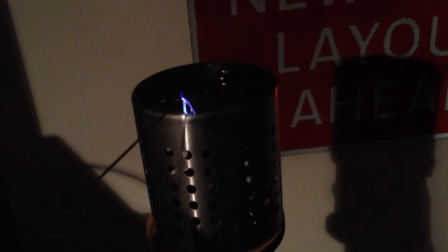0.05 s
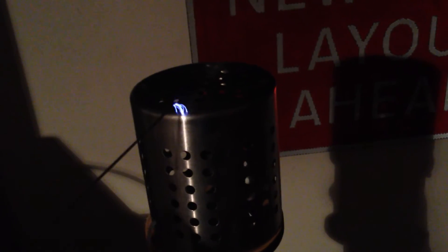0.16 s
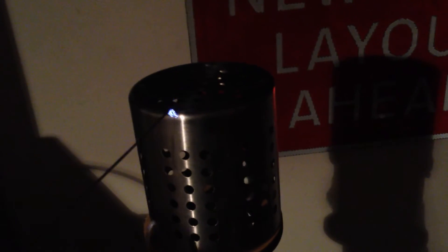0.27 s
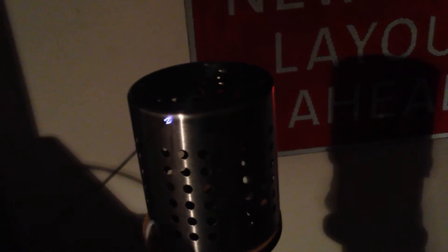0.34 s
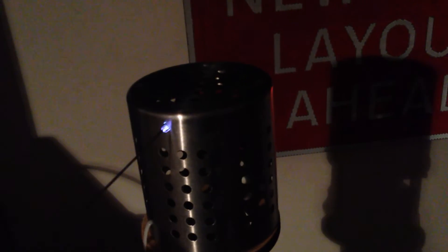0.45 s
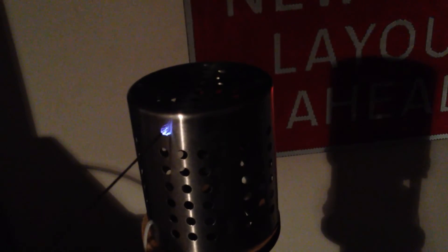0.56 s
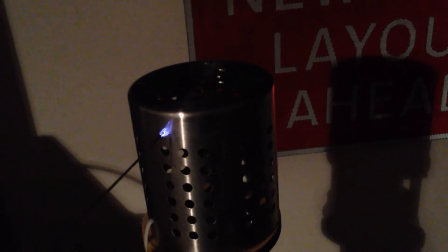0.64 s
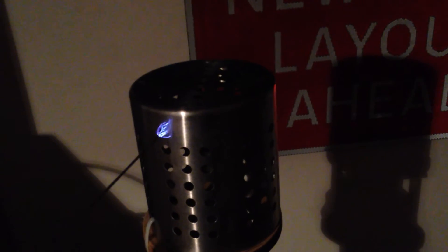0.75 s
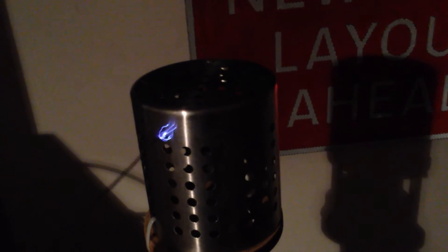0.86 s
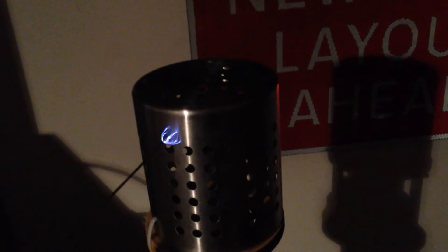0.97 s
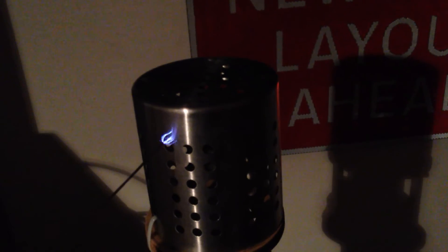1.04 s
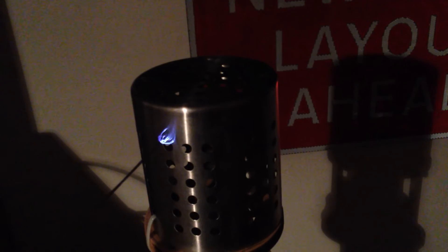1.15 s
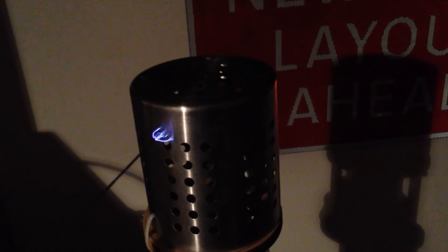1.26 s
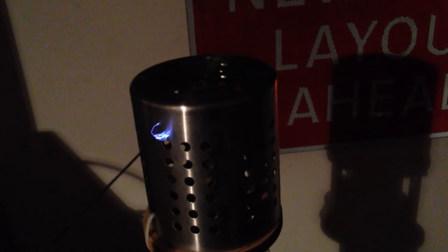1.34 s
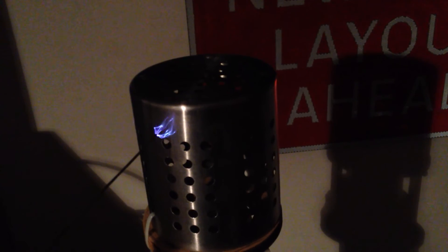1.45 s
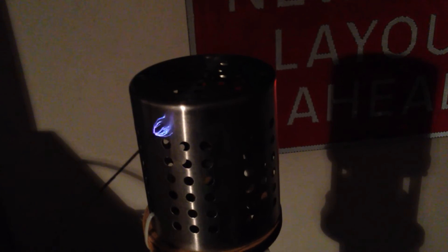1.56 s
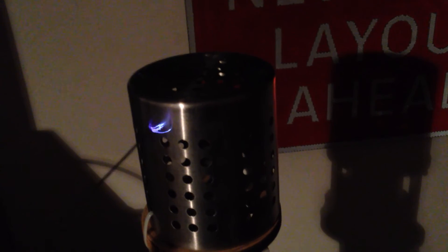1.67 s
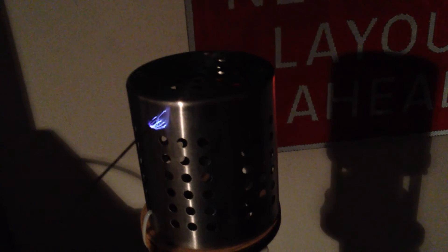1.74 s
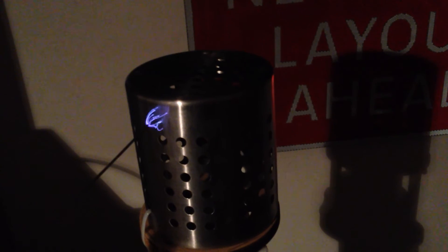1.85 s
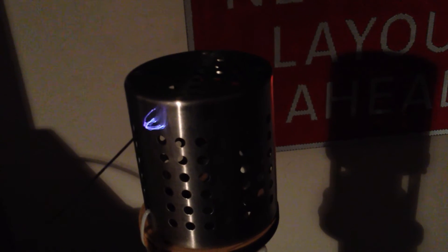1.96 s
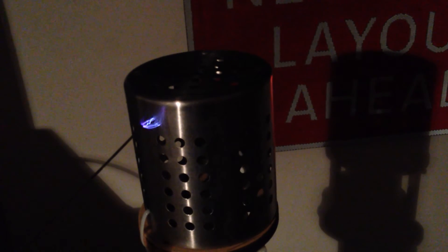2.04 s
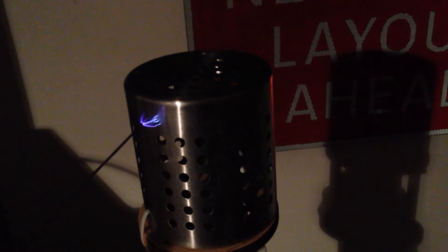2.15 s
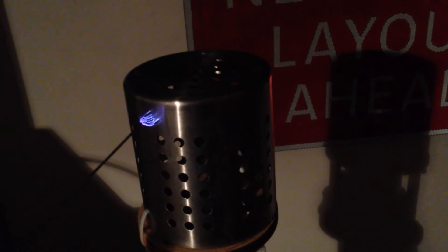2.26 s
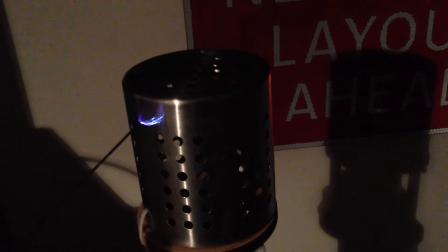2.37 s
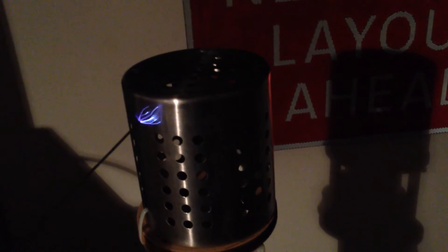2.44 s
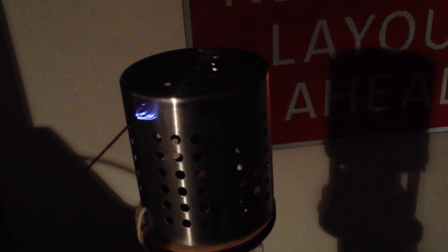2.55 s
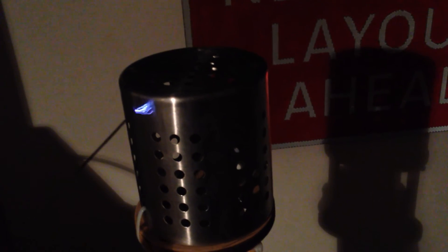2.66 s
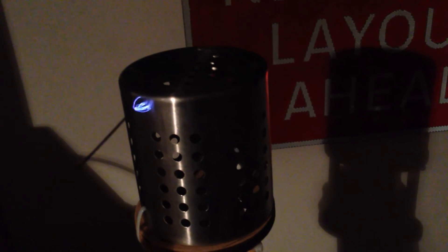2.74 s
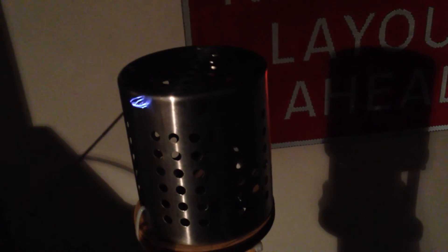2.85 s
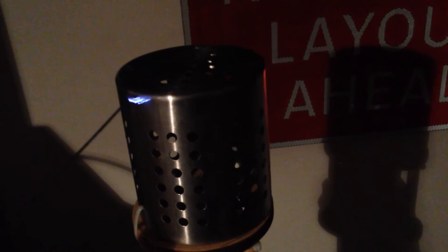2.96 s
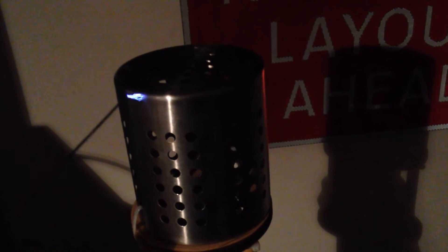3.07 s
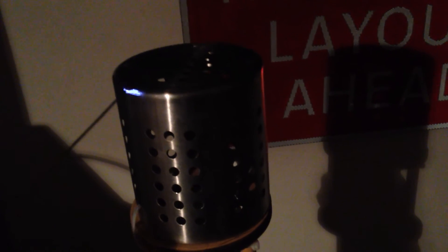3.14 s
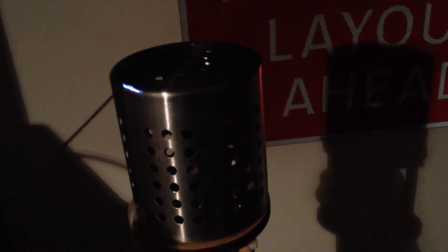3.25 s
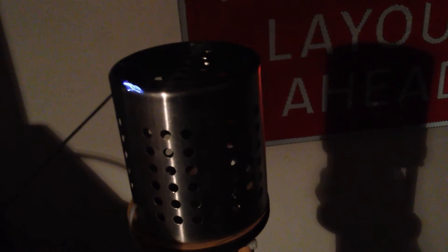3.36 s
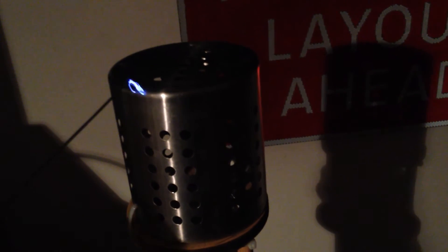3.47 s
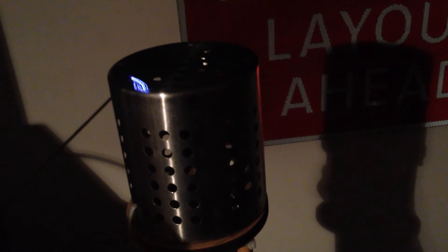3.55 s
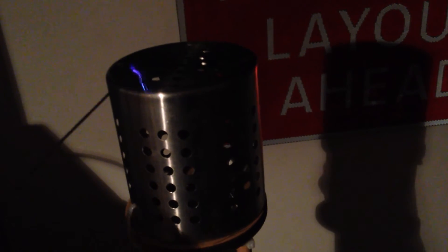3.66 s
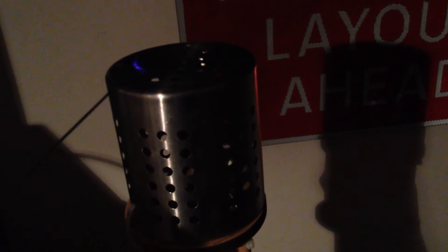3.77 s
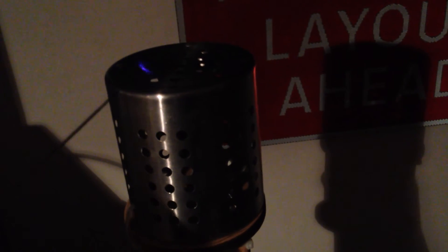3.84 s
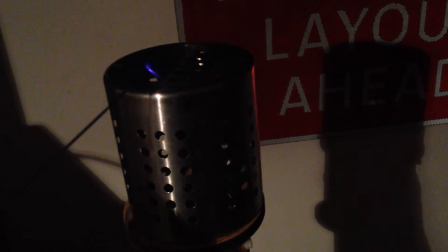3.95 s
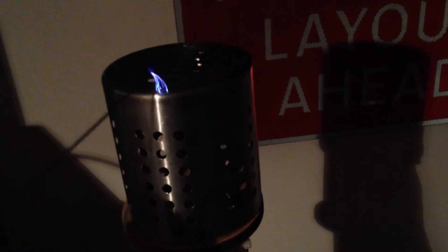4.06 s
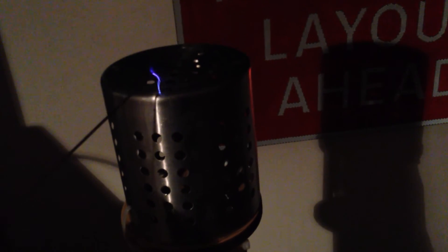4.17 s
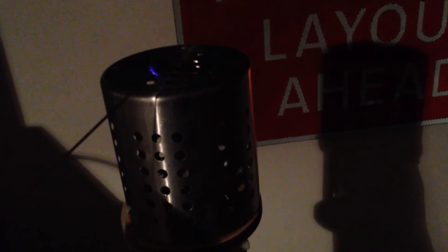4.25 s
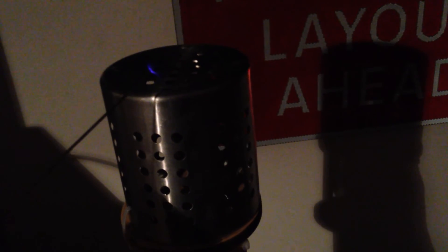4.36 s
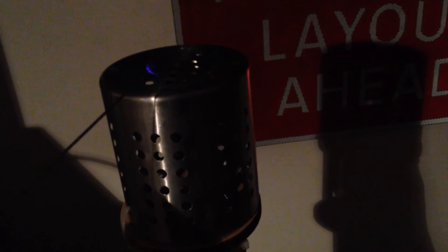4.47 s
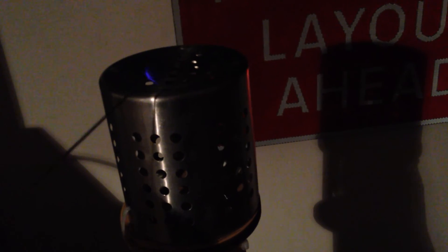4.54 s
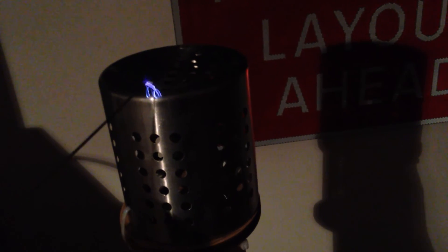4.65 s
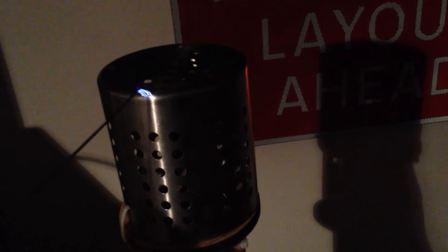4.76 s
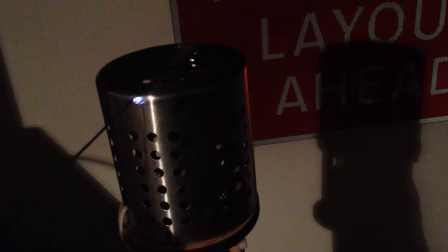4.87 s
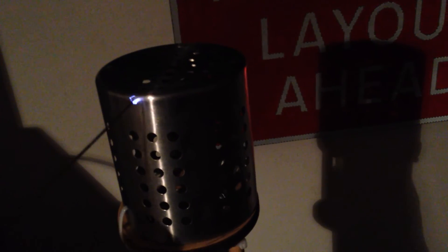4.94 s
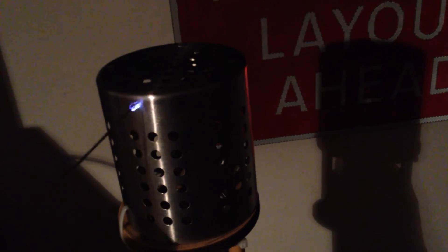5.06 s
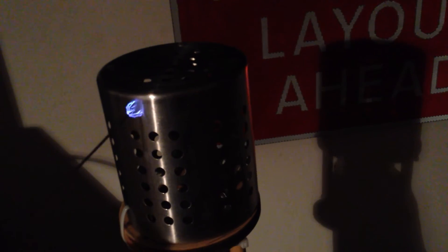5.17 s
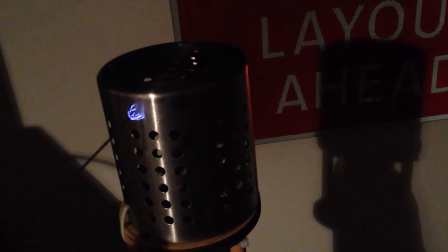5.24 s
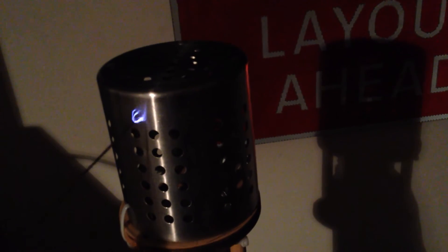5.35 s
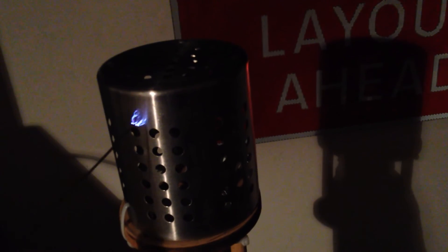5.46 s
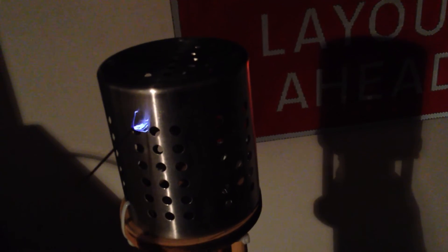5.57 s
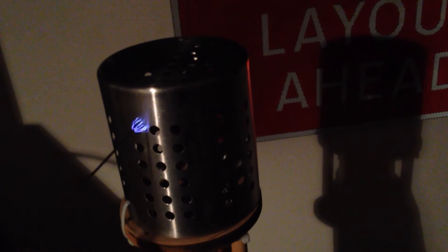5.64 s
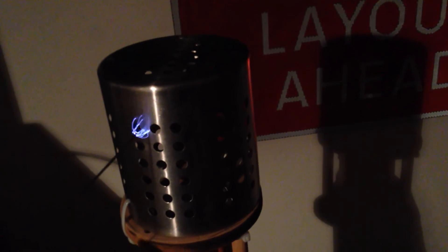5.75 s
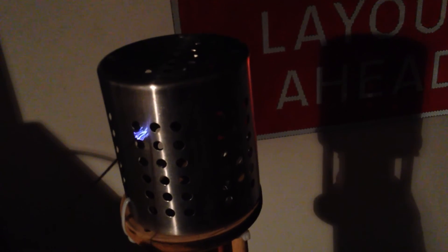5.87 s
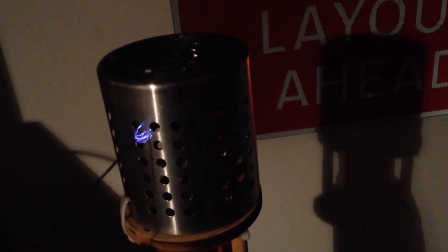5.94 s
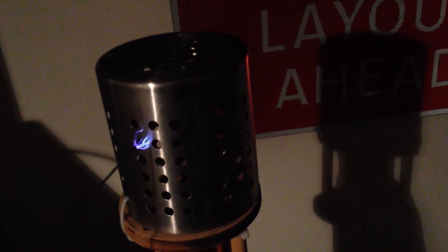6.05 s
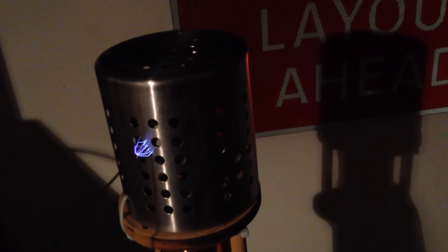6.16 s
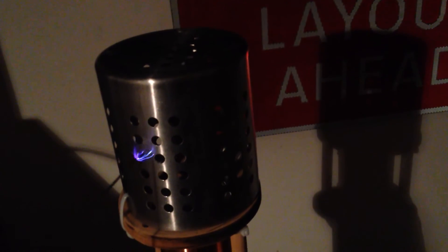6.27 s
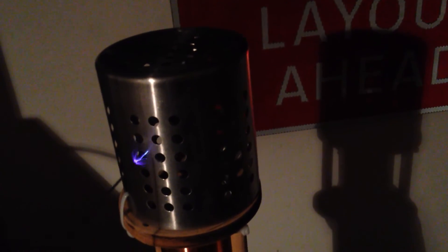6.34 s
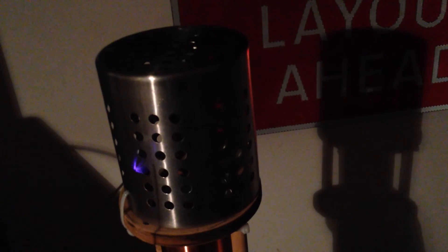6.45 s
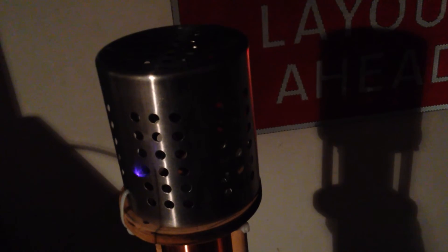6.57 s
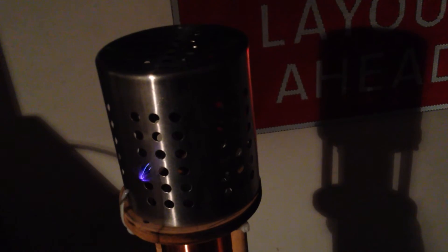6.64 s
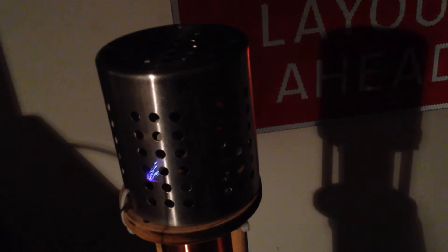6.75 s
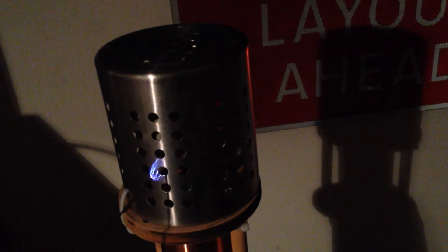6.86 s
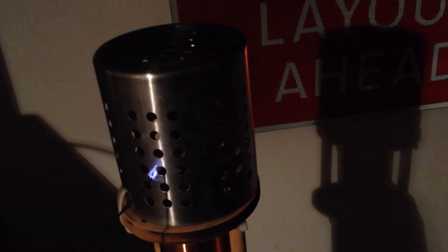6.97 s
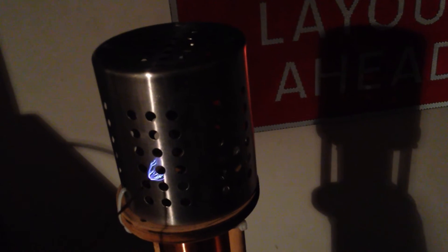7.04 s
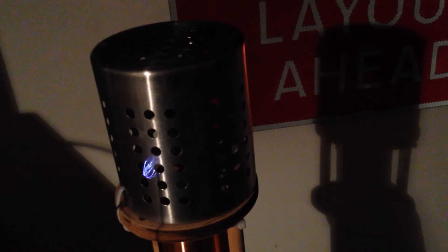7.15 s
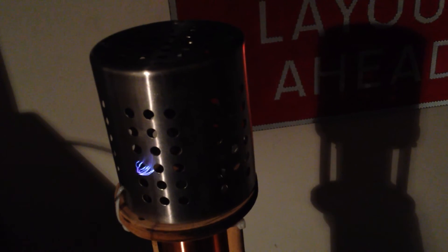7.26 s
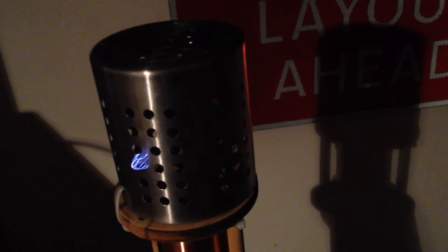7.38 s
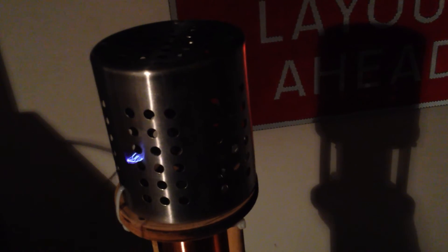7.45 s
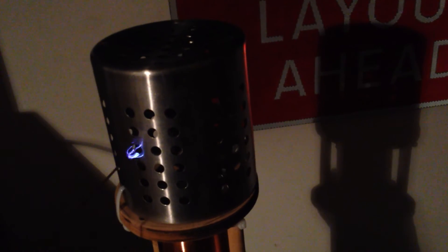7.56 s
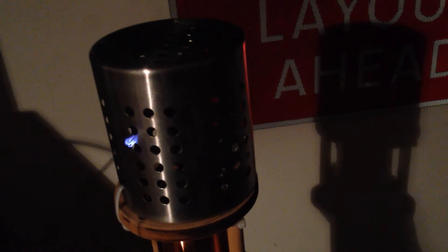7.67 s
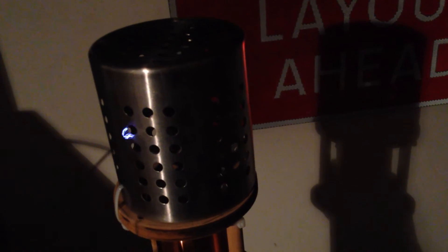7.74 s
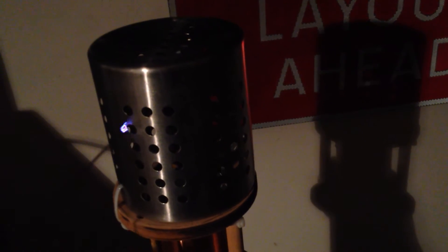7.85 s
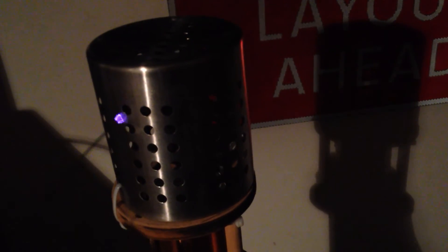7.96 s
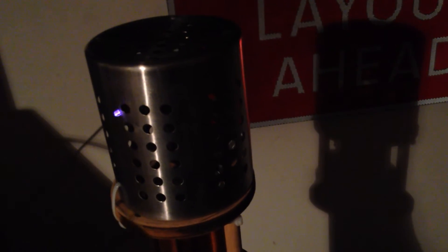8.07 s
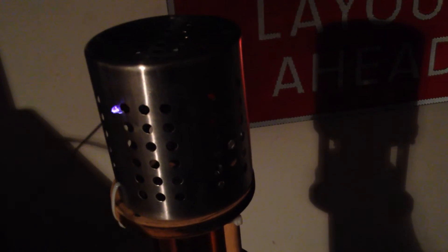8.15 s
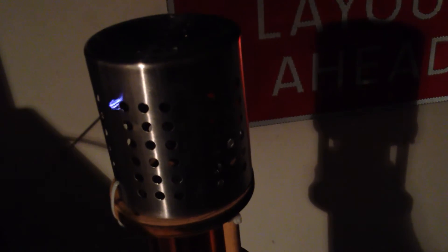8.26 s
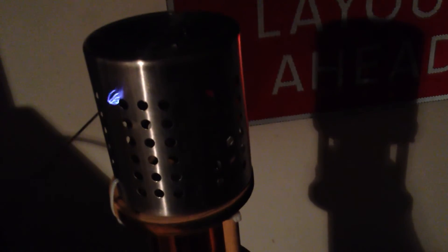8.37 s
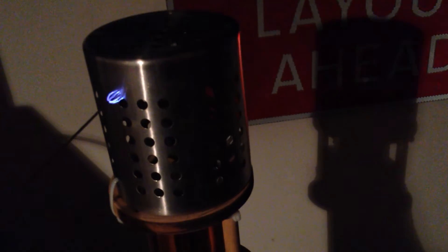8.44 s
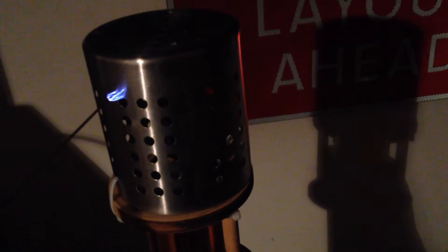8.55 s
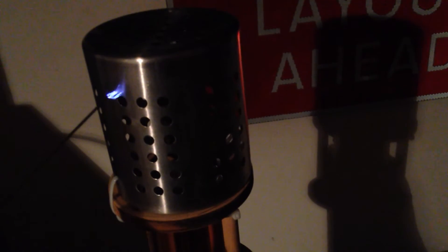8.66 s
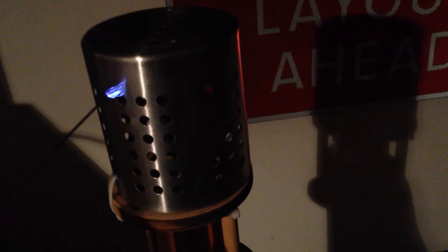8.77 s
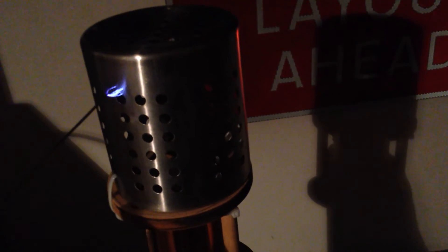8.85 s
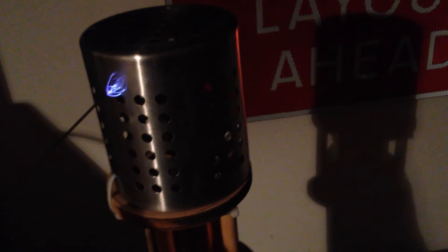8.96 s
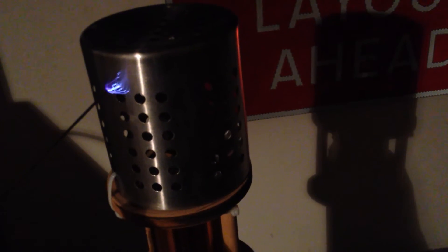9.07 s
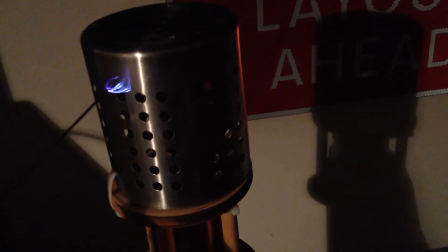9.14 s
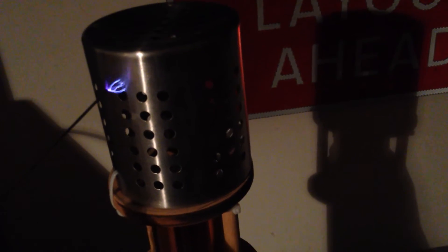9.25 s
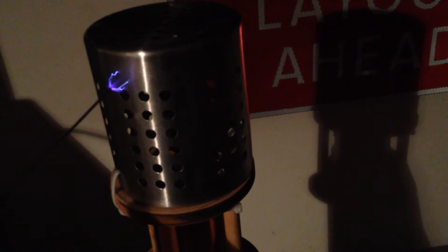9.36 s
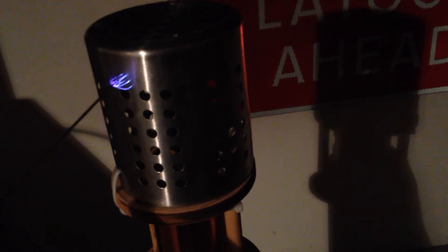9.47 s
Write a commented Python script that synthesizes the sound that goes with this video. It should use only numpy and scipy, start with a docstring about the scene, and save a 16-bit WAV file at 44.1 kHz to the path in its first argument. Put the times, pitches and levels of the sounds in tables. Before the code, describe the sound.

A small high-voltage coil with a motor-driven spark gap buzzes close by in a small room. A soft corona buzz snaps almost at once into a harsh, sizzling arc with low sputter and pops. The arc drops out briefly around four seconds, again after six, and near the end, leaving softer buzz and scattered snaps. Faint motor hum and room air lie underneath. Close mono microphone.

```python
"""A small spark coil buzzes in a room, fired by a rotary gap with eight studs; its motor slowly gains speed, with small sags.
Corona alone comes first: soft pushes in a repeating pattern of eight, a pitched buzz, motor hum and room tone.
A snap at 0.12 s leads in the arc: sharp, sizzling cracks over a low sputter, with hot flares heard as pops.
The arc lets go at 3.7, 4.2, 6.3 and 9.4 s and catches again at 4.1, 4.7 and 6.8 s, with snaps around most of these.
All strikes but the last begin with a surge; the wider the gap, the louder the buzz. Mono, on two equal channels."""
import sys
import numpy as np
from scipy import signal
from scipy.fft import rfft, irfft, next_fast_len
from scipy.io import wavfile
from scipy.ndimage import uniform_filter1d

SR = 44100
rng = np.random.default_rng(int(sys.argv[2]) if len(sys.argv) > 2 else 0)


def generate_wav(sig):
    """Save sig (samples, or channels by samples) to the path in sys.argv[1] as 16-bit PCM at SR."""
    pcm = np.round(np.clip(np.atleast_2d(sig).T, -1, 1) * 32767).astype(np.int16)
    wavfile.write(sys.argv[1], SR, pcm)


N = 419391

# firing rate: [time_s, firings_per_s]
RATE = [(0, 310.6), (0.3, 311.9), (1.2, 318.5), (1.8, 321.3), (2.4, 322.8), (3.3, 326.1), (3.6, 327.0),
        (3.9, 326.4), (4.2, 325.2), (4.7, 323.1), (5.5, 326.3), (6.2, 328.1), (6.8, 326.3), (7.9, 328.8),
        (8.3, 330.7), (9.1, 331.7), (9.5, 331.2)]
# rotor studs, each set slightly off: [late_s, relative_strength_db]
STUDS = [(.00005, -4), (-.00005, -2.5), (0, -1.2), (.00002, 3), (-.00001, 1.4), (-.00007, 2.5),
         (-.00003, 0.7), (.00009, -3.5)]
# burning arc: [time_s, crack_db, sizzle_db, fundamental_db, unsteadiness_db]
ARC = [(0.13, -33, -27.5, -59, -1), (0.42, -41.5, -32, -63, 2.5), (0.58, -35, -28, -55.5, -7),
       (1.05, -33.5, -27.5, -56.5, -2), (1.4, -34, -31, -54, 2), (2.4, -34.5, -32.5, -57.5, 0),
       (2.52, -34, -30.5, -51, 1.5), (3.7, -38.5, -30, -51, 1), (4.7, -37.5, -29, -57.5, -1),
       (5.3, -36.5, -27.5, -54, -4.5), (6.25, -34.5, -32, -53, 0.5), (6.9, -35.5, -29, -55.5, 4),
       (7.4, -36.5, -30, -52, -1), (7.7, -38.5, -32.5, -48.5, 1.5), (8.08, -46, -35.5, -53, 7.5),
       (8.4, -39, -29, -47, 2), (9.1, -35, -28.5, -49.5, -4), (9.39, -35.5, -31.5, -52, 2)]
# buzz, louder as the gap widens: [time_s, harmonics_2_to_4_db, harmonic_5_db, harmonics_from_6_db]
BUZZ = [(0, -52, -49, -46), (0.12, -47, -43.5, -42.5), (0.42, -56, -55, -52), (0.62, -51.5, -46, -53),
        (0.94, -51, -45, -47.5), (0.97, -49, -38, -45.5), (1.4, -46, -43, -44.5), (1.9, -45, -38, -42),
        (2.4, -42.5, -36.5, -40), (3.0, -48.5, -43.5, -45.5), (3.7, -46, -42.5, -42),
        (3.85, -52, -47, -49.5), (4.08, -43.5, -42, -41.5), (4.33, -51, -50, -50), (4.72, -47.5, -43, -47),
        (5.0, -50, -45, -48), (6.15, -45.5, -43.5, -43.5), (6.45, -42, -38.5, -41.5),
        (6.8, -42, -34.5, -41), (7.15, -47, -41.5, -46), (7.75, -48.5, -47, -47.5), (7.95, -52, -53, -53.5),
        (8.28, -49.5, -51, -50), (8.38, -46, -47.5, -46), (8.8, -44.5, -46, -42.5),
        (9.48, -39.5, -40.5, -39)]
# corona alone, relative to the buzz: crack_db, sizzle_db, fundamental_db
CORONA_DB = [-17.5, -9, -17]
# spectrum of a crack: [freq_hz, level_db]
CRACK = [(150, -23), (650, -12.5), (1500, -8), (2500, 1.5), (3300, 2), (4300, -1), (6200, 0), (7200, -1.5),
         (9000, -5), (14000, -42)]
# spectrum of a sizzle: [freq_hz, level_db]
SIZZLE = [(1500, -38.5), (6000, -25), (7400, -10.5), (8500, -4.5), (9700, -1), (11200, -1), (12800, 1.5),
          (14300, 0.5), (15400, -5.5), (17000, -54)]
USUAL_DB = -46  # buzz at a middling gap


def amp(db):
    """Gain of a level in dB."""
    return 10 ** (np.asarray(db) / 20)


def unit(x):
    """x at rms 1."""
    return x / np.sqrt(np.mean(x ** 2) + 1e-20)


def along(points, hz):
    """(Hz, value) points, interpolated on a log frequency axis."""
    point_hz, values = np.transpose(points)
    return np.interp(np.log(hz + 1), np.log(point_hz + 1), values)


def curves(rows, t):
    """Each column after the time, interpolated at times t."""
    time_s, *columns = np.transpose(rows)
    return [np.interp(t, time_s, column) for column in columns]


def filtered(x, response):
    """x times a zero-phase response of frequency."""
    size = next_fast_len(N + SR // 2)
    gain = response(np.fft.rfftfreq(size, 1 / SR))
    return irfft(rfft(x, size) * gain, size)[:N]


def coloured(x, spectrum, size=4096):
    """x through a minimum-phase filter of energy 1 with this spectrum."""
    level_db = along(spectrum, np.fft.rfftfreq(size, 1 / SR))
    cepstrum = irfft(np.log(amp(level_db)))
    # folding the cepstrum makes the filter causal
    cepstrum[1:size // 2] *= 2
    cepstrum[size // 2 + 1:] = 0
    ring = irfft(np.exp(rfft(cepstrum)))
    return signal.fftconvolve(x, ring / np.linalg.norm(ring))[:N]


def pulses(times, sizes):
    """Impulses placed between the samples by a windowed sinc."""
    at = np.ravel(times)[:, None] * SR
    taps = np.floor(at) + np.arange(-7, 9)
    shape = np.sinc(taps - at) * np.sinc((taps - at) / 8)
    index = np.clip(taps, 0, N).astype(int)
    weights = np.ravel(sizes)[:, None] * shape
    return np.bincount(index.ravel(), weights.ravel(), N + 1)[:N]


def firings(turns):
    """Per passing stud: time on the even beat, lateness and strength (dB)."""
    n = np.arange(1, int(turns[-1]))
    late, db = np.array(STUDS)[n % len(STUDS)].T
    beat = np.interp(n, turns, np.arange(N) / SR)
    return beat, late, db


def forks(times, sizes, spread_s, share, count=3):
    """A crooked spark: its side branches are heard just after the main channel."""
    late = spread_s * rng.exponential(size=(len(times), count))
    branch_sizes = share * sizes[:, None] * rng.standard_normal(late.shape)
    return pulses(times, sizes) + pulses(times[:, None] + late, branch_sizes)


def burning(t, strike_s=0.013, break_s=.04, surge_peak_s=0.056):
    """Arc state (0 corona alone, 1 full arc) and the surge after each strike (dB)."""
    # spells of arc held on the metal: [strike_s, break_s, surge_db]
    burns = [(0.13, 3.745, 5.5), (4.116, 4.23, 4.5), (4.703, 6.3, 5.5), (6.81, 9.385, 0)]
    struck = surge_db = 0
    for start, stop, peak_db in burns:
        ramp = np.minimum((t - start) / strike_s, (stop - t) / break_s)
        held = np.clip(ramp + .5, 0, 1)
        age = np.maximum(t - start, 0) / surge_peak_s
        struck = struck + held
        surge_db = surge_db + peak_db * held * age * np.exp(1 - age)
    return struck, surge_db


def arc_levels(t, sizzle_surge=0.6):
    """Crack, sizzle and fundamental of the arc (dB); surges lift and falters dip all three."""
    # brief falters: [time_s, half_length_s (to 1/e of the depth), depth_db]
    falters = [(0.16, 0.01, 8), (2.303, 0.013, 5), (7.94, .02, 8), (8.184, 0.016, 8), (8.248, .015, 5.5)]
    surge_db = burning(t)[1]
    dip_db = sum(db * np.exp(-((t - s) / length) ** 2) for s, length, db in falters)
    shares = (1, sizzle_surge, 1)  # of the surge; the unsteadiness column is left out
    return [db + share * surge_db - dip_db for db, share in zip(curves(ARC, t), shares)]


def fundamental(t):
    """Lowest harmonic (dB): blends from corona level to arc level as the arc strikes."""
    struck = burning(t)[0]
    corona_db = curves(BUZZ, t)[0] + CORONA_DB[-1]
    return struck * arc_levels(t)[-1] + (1 - struck) * corona_db


def unsteady(t):
    """How restlessly the arc dances: around 1 when struck, 0 for corona alone."""
    return burning(t)[0] * amp(curves(ARC, t)[-1])


def discharge(turns, scatter_db=0.95, calm_db=.5, jitter_s=.000012, miss_share=.45, miss_from_db=-14.5,
              miss_range_db=7, miss_per_surge_db=-0.05, push_db=-43, push_grows=1.17, clean_hz=2450):
    """Corona repeats the studs' uneven pattern with little random change; arc cracks scatter on new paths."""
    # spectrum of a corona push: [freq_hz, level_db]
    push_spectrum = [(100, -46), (400, -15), (800, -11.5), (1500, 0), (2300, 0), (3000, -1), (3700, -9),
                     (4600, -18), (8000, -29.5)]
    beat, late, stud_db = firings(turns)
    struck, surge_db = burning(beat)
    low_db, _, high_db = curves(BUZZ, beat) + surge_db
    crack_db, sizzle_db, _ = arc_levels(beat)
    restless = unsteady(beat)
    chance = rng.standard_normal((3, len(beat)))
    times = beat + late + jitter_s * (1 + restless) * chance[0]

    # stud and random unevenness, weighted apart for corona and arc
    stud_weight = 1.3 * (1 - struck) + 0.43 * restless
    random_db = (calm_db * (1 - struck) + scatter_db * restless) * chance[1]
    strength = amp(stud_db * stud_weight + random_db)

    # across a wide gap corona gains on the arc and some firings fail to jump
    wide = np.clip((low_db - sizzle_db - miss_from_db) / miss_range_db, 0, 1)
    miss = np.clip(miss_share * wide + miss_per_surge_db * surge_db, 0, .8)
    jumps = (rng.random(len(beat)) < struck * (1 - miss)) / np.sqrt(1 - miss)  # keeps the mean power

    height = np.sqrt(SR / curves(RATE, beat)[0])  # of the pulses in a train of rms 1
    push = height * amp(push_db + push_grows * (high_db - USUAL_DB))
    crack = height * (jumps * amp(crack_db) + amp(low_db + CORONA_DB[0]))
    sizzle = height * (jumps * amp(sizzle_db) + amp(low_db + CORONA_DB[1]))
    sizzle_strength = strength * amp(0.22 * struck * chance[2])

    cracks = forks(times, crack * strength, spread_s=0.000393, share=0.21, count=6)
    sizzles = forks(times + .00005, sizzle * sizzle_strength, spread_s=0.0002174, share=0.19, count=5)
    sound = coloured(pulses(times, push * strength), push_spectrum)
    sound += coloured(cracks, CRACK)
    sound += coloured(sizzles, SIZZLE)
    # below clean_hz the even part merges into the buzz; only the unevenness rattles
    even = coloured(pulses(beat, push), push_spectrum) + coloured(pulses(beat, crack), CRACK)
    return sound - np.mean(strength) * filtered(even, lambda hz: 1 / (1 + (hz / clean_hz) ** 20))


def buzz(turns, lag_turns=0.041, flicker_db=1.23):
    """Pitched core: harmonics locked to the firings, flickering as much as the arc is unsteady."""
    # overtones: [harmonic, db_over_group at a middling gap, db_per_db_of_group]
    harmonics = [(2, -1, 1.1), (3, 0.5, 0.92), (4, 1, 1.28), (5, 0.5, 1), (6, -0.5, 1.16), (7, 2, 0.92)]
    # room standing waves, crossed as the motor gains speed: [freq_hz, half_width_hz (to 1/e), gain_db]
    standing = [(630, 4.4, 2.5), (663, 1.3, -4.5), (944, 4.7, -4), (957, 4.7, 5.5), (961, 3.2, -4),
                (1276, 9, -6), (1900, 25, 9), (1924, 12.5, -7.5), (2202, 13, 4), (2240, 9, -11)]
    t, beat = np.arange(N) / SR, firings(turns)[0]
    surge_db = burning(beat)[1]
    low, fifth, high = curves(BUZZ, beat) + surge_db
    swing = unit(uniform_filter1d(rng.standard_normal(len(beat)), size=5))  # a channel lasts a few firings
    flicker = flicker_db * unsteady(beat) * swing
    groups = (low, low, low, fifth, high, high)
    overtones = [USUAL_DB + db + grows * (group - USUAL_DB)
                 for (_, db, grows), group in zip(harmonics, groups)]
    rate, core = curves(RATE, beat)[0], 0
    for k, db in enumerate([fundamental(beat)] + overtones, 1):
        standing_db = sum(gain_db * np.exp(-((k * rate - hz) / width) ** 2)
                          for hz, width, gain_db in standing)
        level = np.interp(t, beat, amp(db + standing_db + flicker))
        core = core - level * np.sin(2 * np.pi * k * (turns - lag_turns))
    return core


def motor(turns):
    """The rotor's imbalance hums at the shaft speed and a few multiples."""
    # hum: [multiple_of_shaft_speed, rms_db]
    hum = [(1, -70.5), (3, -78), (4, -79)]
    shaft = turns / len(STUDS)
    return sum(amp(db) * unit(np.sin(2 * np.pi * round(k) * shaft)) for k, db in hum)


def room_tone(rms_db=-56.5):
    """Steady coloured noise of the room's air."""
    # spectrum: [freq_hz, relative_db]
    air = [(20, -20), (70, 2.5), (1000, 5), (12000, -8.5)]
    return amp(rms_db) * unit(coloured(rng.standard_normal(N), air))


def sputter(turns, level_db=7.0, unsteady_db=8.0, scatter_db=6, surge_db=3.0, flare_db=16):
    """Each firing heats the air differently: a low sputter that follows the fundamental, plus flares."""
    # hot flares, heard as low pops: [time_s, level_db before flare_db]
    flares = [(0.182, -39), (0.198, -42), (0.6, -41), (0.9, -44), (1.19, -40), (2.596, -38), (2.679, -39),
              (3.553, -35), (3.7, -39), (4.122, -32), (4.252, -43), (5.755, -41), (6.16, -42), (7.7, -37),
              (8.499, -40), (8.621, -38), (8.973, -40), (9.274, -41)]
    # spectrum of a puff: [freq_hz, level_db]
    thump = [(25, -40), (80, -0.5), (170, 0), (300, 2), (700, 3), (1300, -19), (3000, -32)]
    beat = firings(turns)[0]
    single, slow = rng.standard_normal((2, len(beat)))
    surge = unit(uniform_filter1d(slow, size=10))  # a hot channel lasts several firings
    heat = amp(np.minimum(scatter_db * single + surge_db * surge, 16))
    puff_db = fundamental(beat) + level_db + unsteady_db * (unsteady(beat) - 1)
    puffs = pulses(beat, amp(puff_db) * (heat - heat.mean()))
    times, db = np.transpose(flares)
    return coloured(puffs + pulses(times, amp(db + flare_db)), thump)


def snaps(crack_db=-1.5, sizzle_db=1):
    """Hard sparks across a gap that is nearly too wide, for one firing or a few in a row."""
    # lone sparks as the arc catches or lets go: [start_s, relative_db, firings_in_a_row]
    lone_sparks = [(0.1205, -2.5, 1), (3.755, -9, 1), (3.76, -14, 1), (4.099, -5.5, 3), (4.1211, -1, 1),
                   (4.2497, -5.5, 2), (4.6668, -8, 1), (4.691, -9.5, 3), (6.308, -16, 2), (6.332, -10, 1),
                   (6.3411, -9, 1), (6.354, -11, 1), (6.366, -10, 1), (6.381, -11, 1), (6.4114, -10, 2),
                   (6.4327, -13, 1), (6.6497, -11, 1), (6.6834, -12, 1), (6.6985, -7.5, 1),
                   (6.7229, -12, 1), (6.7574, -7.5, 1), (6.7722, -7.5, 3), (6.7964, -5, 2), (9.401, -10, 1),
                   (9.4195, -9.5, 3), (9.468, -8.5, 1), (9.4735, -8.5, 2), (9.498, -9.5, 2)]
    hits = []
    for start, level, run in lone_sparks:
        for k in range(round(run)):
            hits.append((start + k / curves(RATE, start)[0], level))
    times, db = np.transpose(hits)
    sparks = forks(times, amp(db), spread_s=0.000256, share=0.37)
    return amp(crack_db) * coloured(sparks, CRACK) + amp(sizzle_db) * coloured(sparks, SIZZLE)


def room(x, count=32):
    """Adds decaying noise tails, crossfaded one to the next as the arc wanders."""
    # room's answer: [freq_hz, t60_s, level_db]
    room_bands = [(200, 0.28, 4), (2370, 0.25, -3.5), (5200, 0.2, -2.5), (13000, 0.17, -2.5)]
    out, hop = np.pad(x, (0, SR)), N // (count - 1) + 1
    band_hz, band_t60, band_db = np.transpose(room_bands)
    for centre in hop * np.arange(count):
        hz, t, z = signal.stft(rng.standard_normal(SR // 3), SR, nperseg=256)
        t60 = along(np.c_[band_hz, band_t60], hz)[:, None]
        db = along(np.c_[band_hz, band_db], hz)[:, None]
        # the root evens out the energy of long and short tails
        fade = amp(db - 60 * t / t60) * np.sqrt(2 * np.log(1000) / (t60 * SR))
        tail = signal.istft(z * fade, SR, nperseg=256)[1]
        at = np.arange(max(centre - hop, 0), min(centre + hop, N))
        window = np.cos(np.pi / 2 * (at - centre) / hop)
        answer = signal.fftconvolve(x[at] * window, tail)
        out[at[0]:at[0] + len(answer)] += answer
    return out[:N]


def scene():
    """Coil, room and motor, summed to one signal on two channels."""
    turns = np.cumsum(curves(RATE, np.arange(N) / SR)[0]) / SR  # studs passed so far
    sparks = discharge(turns) + sputter(turns) + snaps()
    mono = room(sparks) + buzz(turns) + motor(turns) + room_tone()
    return np.array([mono, mono])


def record(dry, top_hz=15550):
    """Cuts everything from top_hz up."""
    return np.array([filtered(channel, lambda hz: hz < top_hz) for channel in dry])


dry = scene()
out = record(dry)
generate_wav(out)
```